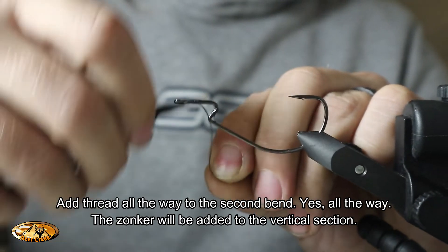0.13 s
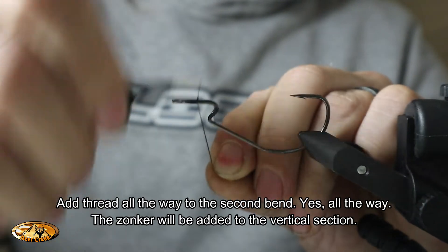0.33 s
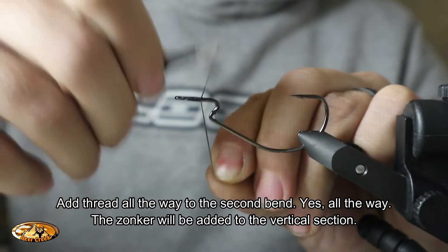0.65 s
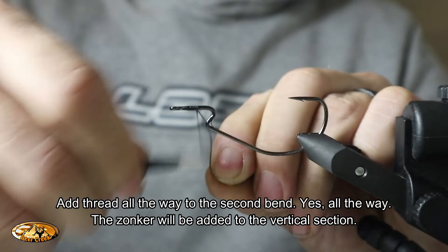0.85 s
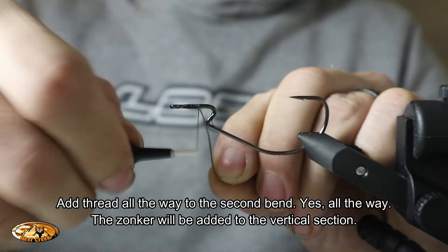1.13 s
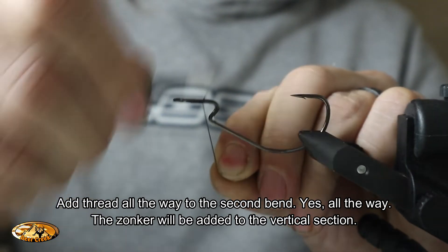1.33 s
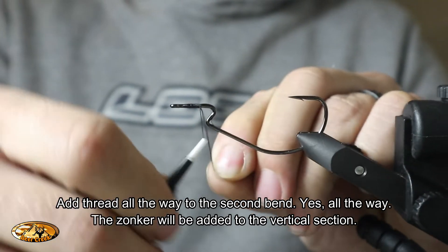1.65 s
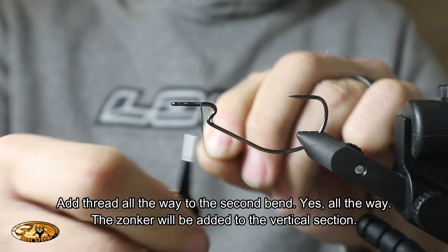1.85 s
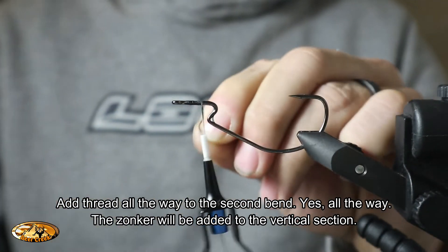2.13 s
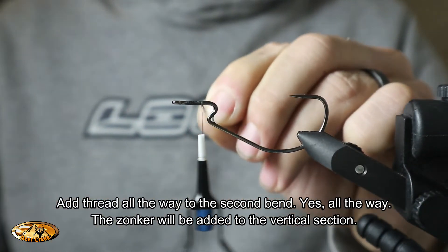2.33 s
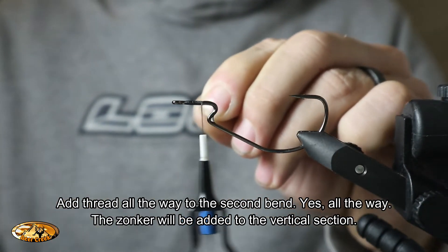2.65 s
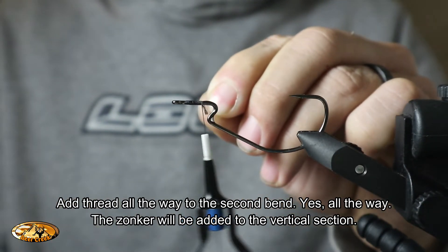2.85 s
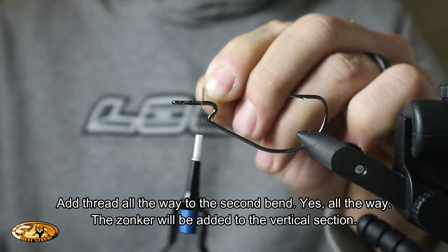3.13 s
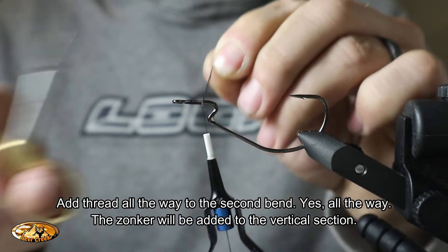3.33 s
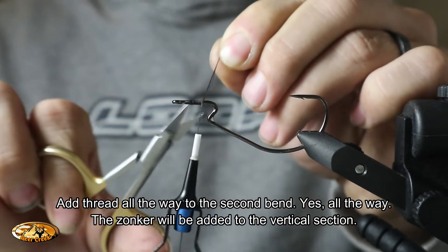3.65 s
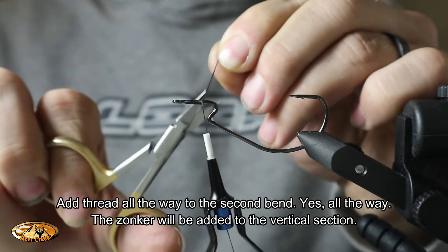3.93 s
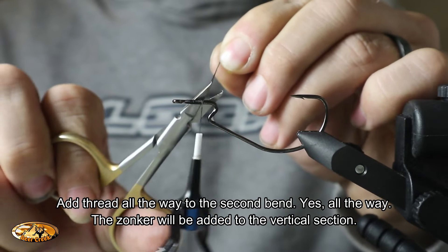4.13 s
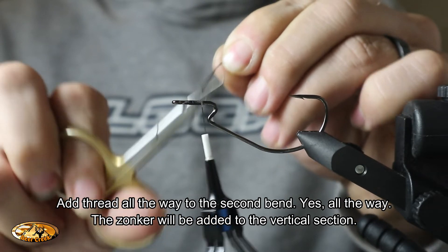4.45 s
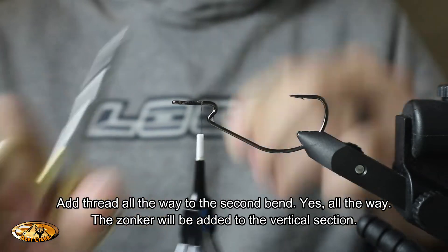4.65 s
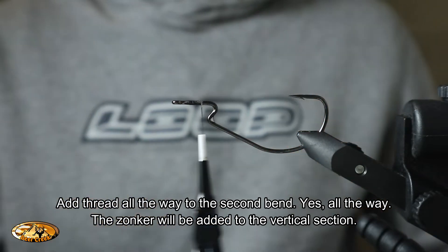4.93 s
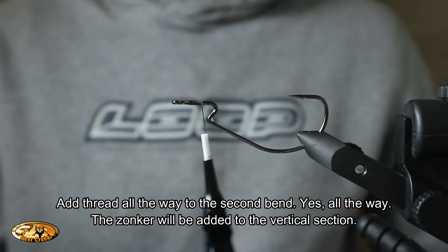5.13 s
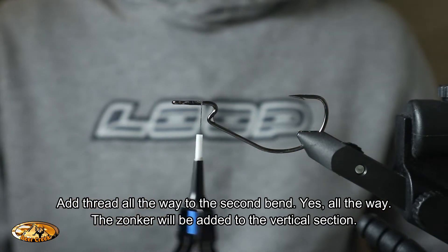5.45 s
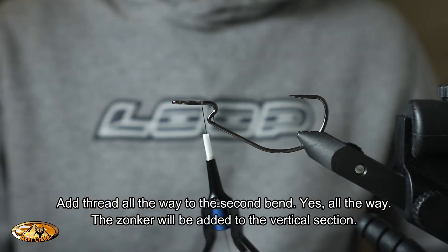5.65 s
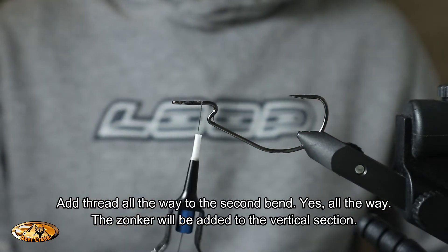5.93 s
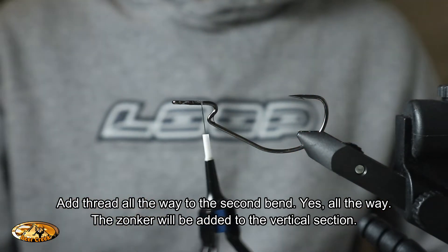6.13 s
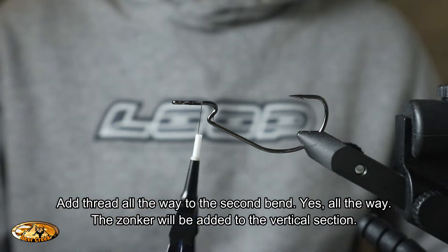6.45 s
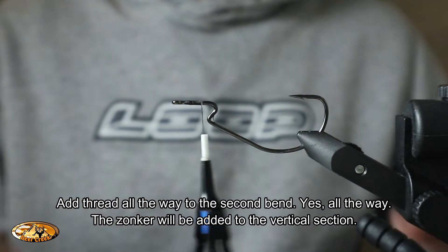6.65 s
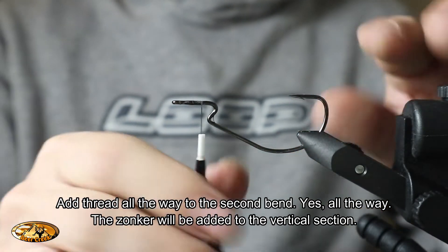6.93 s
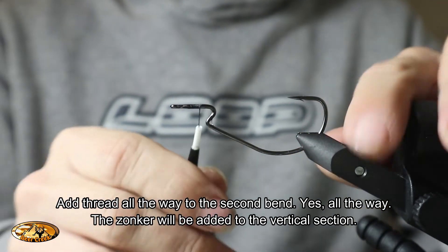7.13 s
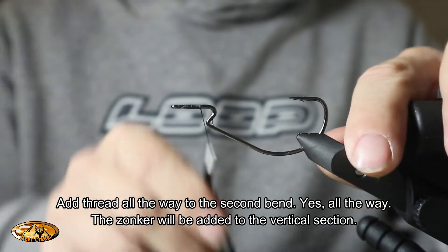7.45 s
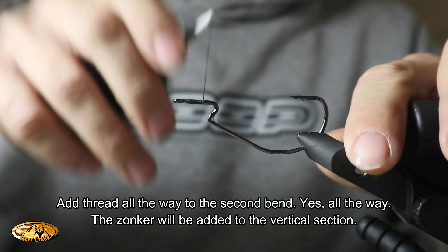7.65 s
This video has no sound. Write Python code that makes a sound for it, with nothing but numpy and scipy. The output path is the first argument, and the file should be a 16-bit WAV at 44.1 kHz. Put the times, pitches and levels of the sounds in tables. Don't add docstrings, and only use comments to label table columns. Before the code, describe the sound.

Faint thread-winding ticks, a bright scissors clatter, a tiny snip, then three loud woody knocks with quick bounces over steady soft hiss.

```python
import sys
import numpy as np
from scipy import signal
from scipy.fft import rfft, irfft, next_fast_len
from scipy.io import wavfile
from scipy.ndimage import uniform_filter1d

SR = 44100
rng = np.random.default_rng(int(sys.argv[2]) if len(sys.argv) > 2 else 0)


def output_pcm(signal):
    pcm = np.clip(np.atleast_2d(signal).T, -1, 1) * 32767
    wavfile.write(sys.argv[1], SR, np.round(pcm).astype(np.int16))


def convert_level_to_amplitude(level_db):
    exponent = np.asarray(level_db, float) / 20
    return 10 ** exponent


N = 343980

# f/Hz, level/dB, t60/s
DESK_MODES = [(208, -0.5, 0.041), (266.5, -6, 0.35), (388, 4.5, 0.042), (492.4, -6, 0.44),
              (580, -2.5, 0.085), (757, -20.5, 0.16), (1010, -30, 0.042), (1000, 3.5, 0.015)]


def rms_one(x):
    return x / np.sqrt(np.mean(x ** 2) + 1e-20)


def at_hz(points, hz):
    table = np.array(points)
    return np.interp(np.log(hz + 1), np.log(table[:, 0]), table[:, 1])


def colour(x, points, even_hz=0):
    size = 2 * next_fast_len(len(x) // 2 + 1)
    spectrum = rfft(x, size)
    gain = convert_level_to_amplitude(at_hz(points, np.fft.rfftfreq(size, 1 / SR)))
    if even_hz:
        own = uniform_filter1d(np.abs(spectrum) ** 2, int(even_hz * size / SR))
        gain *= np.sqrt(np.mean(own) / own)
    cepstrum = irfft(np.log(gain), size)
    cepstrum[1:size // 2] *= 2
    cepstrum[size // 2 + 1:] = 0
    return irfft(spectrum * np.exp(rfft(cepstrum)), size)[:len(x)]


def band(x, low_hz, high_hz, order=2):
    sos = signal.butter(order, [low_hz, min(high_hz, 20000)], "band", fs=SR, output="sos")
    return signal.sosfilt(sos, x + 1e-18)


def drift(rate_hz):
    r = np.exp(-80 * np.pi * rate_hz / SR)
    slow = signal.lfilter([1], [1, -2 * r, r * r], rng.standard_normal(N // 40 + 1002))[1000:]
    return np.interp(np.arange(N) / 40, np.arange(len(slow)), rms_one(slow))


def ring(force, hz, t60):
    r = convert_level_to_amplitude(-60 / (t60 * SR))
    w = 2 * np.pi * hz / SR
    return signal.lfilter([0, np.sin(w)], [1, -2 * r * np.cos(w), r * r], force + 1e-18)


def body(force, modes, damping, spread_db):
    out = 0
    for k, (hz, db, t60) in enumerate(modes):
        push = force * convert_level_to_amplitude(db + spread_db * drift(47.5))
        out = out + (-1) ** k * ring(push, hz, min(t60 * damping, .07))
    return out


def contacts(rows, index, first, cycles=0, axis=3):
    out, t = np.zeros(N + 2000), np.arange(2000) / SR
    chatter = rng.standard_normal((len(rows), 2000))
    for row, noise in zip(rows, chatter):
        contact_ms = max(row[axis], .1)
        burst = np.append(first, noise[1:]) * np.exp(-t * 1000 / contact_ms)
        if cycles:
            burst = ring(burst, row[-1], cycles / row[-1])
        at = round(row[0] * SR)
        out[at:at + 2000] += convert_level_to_amplitude(row[index]) * burst / np.sqrt(np.sum(burst ** 2))
    return out[:N]


def touches(rows, tool_db, broad_db, own_db, cycles, top_hz):
    # f/Hz, level/dB, t60/s
    tool_modes = [(907, -2.5, 0.27), (1067, -25, 0.13), (1950, 5, 0.074), (2400, 7, 0.06), (2480, 4, 0.16),
                  (2600, 0.5, 0.055), (2850, -15, 0.14), (3960, -9, 0.073), (5600, -44, 0.83),
                  (5850, 9, 0.055)]
    force = contacts(rows, index=1, first=0.32)
    tick = convert_level_to_amplitude(tool_db) * body(force, tool_modes, damping=0.22, spread_db=-4.0)
    tick += convert_level_to_amplitude(broad_db) * force
    tick += convert_level_to_amplitude(own_db) * contacts(rows, index=1, first=0.86, cycles=cycles)
    force = contacts(rows, index=2, first=4.9)
    knock = convert_level_to_amplitude(7.0) * body(force, DESK_MODES, damping=0.17, spread_db=1.5)
    knock += convert_level_to_amplitude(25.0) * band(force, 230, 900, order=3)
    return band(tick, 565, top_hz, order=3) + knock


def hiss(spectrum, db):
    return convert_level_to_amplitude(db) * rms_one(colour(rng.standard_normal(N), spectrum))


def room(x, wet_db):
    # f/Hz, level/dB
    echo_colour = [(100, 9), (250, -4.5), (1000, -0.5), (4000, 0.5), (10000, -5.5), (16500, -10),
                   (22000, -54)]
    # f/Hz, t60/s
    decay = [(150, 0.74), (400, 0.25), (1000, 0.19), (2500, 0.18), (6000, 0.16), (12000, 0.14)]
    t = np.arange(SR // 2) / SR
    splits = 90 * 2.0 ** np.arange(0, 7.6, .5)
    tail = 0
    for low, high in zip(splits, splits[1:]):
        fade = convert_level_to_amplitude(-60 * t / at_hz(decay, np.sqrt(low * high)))
        tail = tail + band(rng.standard_normal(len(t)), low, high) * fade
    tail *= np.clip((t - .002) / 0.003, 0, 1)
    tail = colour(tail, echo_colour, even_hz=130.0)
    return signal.fftconvolve(x, convert_level_to_amplitude(wet_db) * tail / np.sqrt(np.sum(tail ** 2)))[:N]


def pushes(rows, rise_db_per_s, rest_db):
    t = np.arange(0, N + 40, 40) / SR
    power = 0
    for row in rows:
        fall_db = np.where(t < row[0], rise_db_per_s * (row[0] - t), 60 * (t - row[0]) / row[-1])
        power = power + convert_level_to_amplitude(2 * (row[1] - fall_db))
    tremor = convert_level_to_amplitude(2 * (rest_db + 4.1 * drift(2.4)))
    return np.sqrt(np.interp(np.arange(N) / SR, t, power) + tremor)


def sway(hz, wander, gain):
    phase = 2 * np.pi * np.cumsum(hz * (1 + wander * drift(13.7))) / SR
    return np.sqrt(2) * np.sin(phase) * gain


def desk_rock():
    # t/s, peak level/dB, f/Hz, t60/s
    shoves = [(0.058, -45, 65.5, 0.94), (0.2, -51.5, 55.8, 0.79), (0.392, -53, 61, 1.9),
              (0.59, -61, 63.5, 2), (0.85, -55, 60.1, 3.9), (1.13, -43, 61.6, 0.21), (1.21, -49, 60, 1.6),
              (1.429, -45.5, 60.9, 0.74), (1.56, -56, 54, .5), (1.65, -52, 56.9, 1.2),
              (2.021, -32, 63.8, 0.098), (2.12, -44, 74.3, 0.48), (2.18, -46, 59.4, 0.37),
              (2.78, -42, 73.2, 0.95), (2.869, -37, 63, 0.55), (3.52, -61, 61.4, 1.15),
              (3.82, -56, 62.5, 1.3), (4.11, -47.5, 58.2, 0.36), (4.432, -30.5, 60.2, 0.55),
              (5.73, -56, 71, 0.25), (6.15, -42, 64.3, 0.15), (6.28, -66, 70.6, 0.17),
              (7.152, -29.5, 58.5, 0.22), (7.429, -52, 60.2, 1.23), (7.69, -42.5, 61.3, 0.98),
              (7.795, -36.5, 60, 0.49)]
    # t/s, peak level/dB, f/Hz, t60/s
    jolts = [
        (5.565, -44, 72.3, 0.38),
        (6.11, -38.5, 63.9, 0.78),
        (6.45, -33, 73.9, 0.48),
        (7.055, -29, 65.4, 0.61),
    ]
    times, pitches = np.array(sorted(shoves + jolts))[:, [0, 2]].T
    hz = np.interp(np.arange(N) / SR, times, pitches)
    gain = pushes(shoves, rise_db_per_s=315, rest_db=-79)
    gain = gain + pushes(jolts, rise_db_per_s=1403, rest_db=-120)
    return sway(hz, wander=0.049, gain=gain)


def desk_flex():
    # t/s, peak level/dB, t60/s
    taps = [(0.05, -51, 0.11), (0.39, -48, 0.11), (0.59, -59, 0.44), (1.13, -46, 0.11), (1.21, -48.5, 0.34),
            (1.43, -53, 0.35), (1.56, -47, 0.079), (1.65, -57.5, 0.71), (1.96, -50.5, 0.83),
            (2.02, -44, 0.15), (2.11, -50, 0.15), (2.91, -31.5, 0.083), (3.01, -44, 0.38), (3.26, -69, 0.7),
            (4.28, -67, 0.23), (4.41, -41, 0.18), (4.72, -69, 0.58), (5.73, -43, 0.082), (5.89, -56, 0.14),
            (6.14, -50, 0.072), (6.58, -41.5, 0.52), (7.21, -46, 0.067), (7.69, -55, 0.39)]
    # t/s, peak level/dB, t60/s
    struck = [
        (2.768, -34.5, 0.18),
        (5.55, -40, 0.27),
        (6.094, -22.5, 0.26),
        (6.266, -28.5, 0.18),
        (6.438, -19, 0.18),
        (7.045, -33, 0.35),
    ]
    gain = pushes(taps, rise_db_per_s=552, rest_db=-69)
    gain = gain + pushes(struck, rise_db_per_s=4004, rest_db=-120)
    return sway(144.6, wander=0.0513, gain=gain)


def bead():
    # t/s, level/dB, f/Hz, t60/s
    note = [
        (3.072, -38, 925, 0.04),
    ]
    s, db, hz, t60 = note[0]
    click = np.zeros(N)
    click[round(s * SR)] = convert_level_to_amplitude(db)
    return ring(click, hz, t60)


def stroke(row, press, index):
    attack_s, release_s, edge_db = 0.03, 0.014, 33
    t = np.arange(N) / SR - row[0]
    edge = np.clip(1 - t / attack_s, 0, None) + np.clip((t - row[1]) / release_s, 0, None)
    pressure_db = press[index] * np.clip(t / row[1], 0, 1)
    return convert_level_to_amplitude(row[index + 2] + pressure_db - np.minimum(edge_db * edge, 200))


def drags():
    # start t/s, length/s, body level/dB, sheen level/dB, rumble level/dB
    strokes = [
        (1.129, 0.23, -46, -45.5, -52.5),
        (2.626, 0.15, -34, -41, -55.5),
        (2.734, 0.227, -65, -76, -32),
        (6.333, 0.087, -51.5, -53, -43.5),
        (7.037, 0.13, -51.5, -60, -49),
    ]
    # body/dB, sheen/dB, rumble/dB
    presses = [
        (-18.5, -35, 3.5),
        (-12.5, -25, 21.5),
        (-14, -23, 1),
        (6, -18, 17.5),
        (-2.5, -6, -2),
    ]
    centres = [2350, 2566, 2570, 1757, 3580]
    widths = [2.5, 0.77, .6, 1.4, .1]
    slips = convert_level_to_amplitude(3.5 * np.minimum(rng.exponential(1, N), 4))
    slips = slips * rng.choice([-1, 1], N) * (rng.random(N) < 6000 / SR)
    broad = rms_one(band(slips, 780, 3800, order=3))
    desk = rms_one(body(slips[::-1], DESK_MODES, damping=0.3, spread_db=2.0))
    sheen = rms_one(band(slips, 5730, 9850, order=4))
    out = 0
    for row, press, hz, wide in zip(strokes, presses, centres, widths):
        rub = wide * broad + rms_one(ring(slips, hz, 16.0 / hz))
        out = out + rub * stroke(row, press, index=0)
        out = out + sheen * stroke(row, press, index=1) + desk * stroke(row, press, index=2)
    return convert_level_to_amplitude(-8.5) * out


def steel_edges():
    # t/s, level/dB, contact/ms
    meets = [
        (0.366, -61, 1.17),
        (1.118, -64.5, 2.56),
        (1.147, -48, 4),
        (1.157, -35, 3.3),
        (1.194, -47, 1.8),
        (2.842, -33.5, 8),
        (2.931, -40, 3.4),
        (7.641, -58, 1.31),
    ]
    # t/s, level/dB, contact/ms
    cuts = [
        (4.7, -45, 2.5),
        (4.3685, -39.5, 2),
        (4.3805, -37.5, 1.2),
        (4.371, -41, 12),
    ]
    rub = band(contacts(meets, index=1, first=1.4, axis=2), 5500, 10000, order=2)
    cut = contacts(cuts, index=1, first=1.4, axis=2)
    cut = convert_level_to_amplitude(-6.0) * band(cut, 4600, 15000) + convert_level_to_amplitude(-7) * ring(cut, 9800, 0.0016)
    return convert_level_to_amplitude(11.5) * (rub + cut)


def handling():
    # t/s, tick peak level/dB,
    # knock level/dB, contact/ms, tick f/Hz
    small_touches = [(0.271, -40.5, -50.5, 3, 1370), (0.366, -34.5, -51, 1.8, 2450),
                     (0.377, -46, -53.5, 1.4, 2500), (1.241, -34, -54, 2.8, 2010), (0.496, -53, -62, 1.7, 1950),
                     (0.534, -48, -52, 0.51, 1230), (0.786, -41.5, -56, 1.4, 2400), (0.905, -48, -51, 4, 1216),
                     (1.118, -34.5, -47.5, 2.5, 2400), (1.157, -39, -68, 2.4, 2290), (1.162, -38, -69, 5.1, 2850),
                     (1.165, -30, -69, 6.5, 3600), (1.183, -43, -67, 4, 2150), (1.194, -45, -53, 3, 2260),
                     (1.203, -38, -51, 4, 2800), (1.221, -41, -48, 5.1, 2250), (1.408, -35.5, -44, 1.2, 2500),
                     (1.509, -34.5, -60, 1.5, 2300), (1.5165, -33.5, -53, 4, 1250), (1.532, -39, -48, 1.9, 2300),
                     (3.989, -44.5, -61, 3.2, 2320), (4.333, -48, -71, 4, 2500), (4.3675, -43.5, -70, 2.9, 2380),
             (4.378, -40.5, -74, 2.9, 2006), (5.542, -32, -41, 2.4, 2250), (5.549, -33, -41, 4.8, 3350),
             (5.63, -47, -66, 5.5, 3000), (5.711, -41, -46, 2.5, 1300), (7.626, -59, -63, 1.4, 2400),
             (7.641, -38.5, -67, 1.4, 2530), (7.712, -45, -69, 3.9, 2400), (7.746, -50, -73, 2.5, 2463)]
    ticks = touches(small_touches, tool_db=-51, broad_db=17.5, own_db=15, cycles=10.0, top_hz=3860)
    return band(ticks, 40, 4630)


def scissors_clatter():
    # t/s, tick peak level/dB, knock level/dB, contact/ms, tick f/Hz
    hits = [(2.651, -33, -55, 3.7, 2150), (2.7605, -50, -27, 3, 870), (2.8015, -25, -33, 3, 2540),
            (2.806, -28, -46, 2.6, 927), (2.8395, -15.5, -41, 5, 2550), (2.8435, -16, -36, 2.2, 2470),
            (2.8476, -13.5, -23, 2.5, 2480), (2.856, -22, -33, 1.05, 2370), (2.859, -22.5, -32, 3.2, 3950),
            (2.849, -22, -28.5, 5.5, 4240), (2.868, -23, -54, 2.6, 2600), (2.879, -38, -49, 3.3, 2450),
            (2.9065, -21.5, -52, 5, 2500), (2.911, -33, -35, 7.6, 4160), (2.927, -18.5, -29, 5, 920),
            (2.930, -38, -54, 2.7, 4160), (2.939, -21.5, -59, 5.4, 1000), (2.963, -27, -48, 3.2, 1020),
            (2.970, -26.5, -46, 1.34, 2550), (2.974, -22.5, -31.5, 7.3, 1250), (2.982, -28, -41, 2.1, 2400),
            (2.989, -28, -48, 3, 3570), (2.992, -30, -42, 1.8, 2500), (2.997, -29.5, -45, 3, 3600),
            (2.811, -25, -40, 5.1, 2500), (3.006, -35, -60, 10, 3630)]
    ticks = touches(hits, tool_db=-17.5, broad_db=13.0, own_db=13.5, cycles=26.0, top_hz=4700)
    return band(ticks, 40, 4900, order=4)


def cracks():
    # t/s, crack level/dB, thud level/dB
    blows = [
        (6.0884, -28, 9.5),
        (6.0900, -30, 6),
        (6.2586, -55, 4),
        (6.2868, -50, -5),
        (6.4315, -23, 1),
        (6.4328, -24, 5),
        (6.4382, -28, 5),
    ]
    s, crack_db, thud_db = np.transpose(blows)
    clicks = np.zeros((2, N))
    clicks[:, np.round(s * SR).astype(int)] = convert_level_to_amplitude(np.array([crack_db, thud_db]))
    return band(clicks[0], 7000, 14000) - band(clicks[1], 248, 1090)


def drops():
    # t/s, peak level/dB, contact/ms
    falls = [
        [(6.0884, -8, 0.7), (6.0897, -6.5, 1.7), (6.0930, -7.5, 3.3), (6.0975, -7.5, 11)],
        [(6.2585, -11, 7.6), (6.2660, -10.5, 2.1)],
        [(6.4315, -1, 0.93), (6.4325, 0.5, 1), (6.4333, -2.5, 0.45), (6.4380, -11.5, 0.61), (6.4420, -21, 7.3)],
    ]
    # f/Hz, level/dB per Hz
    colours = [
        [(110, -40), (200, -6.5), (400, -5), (1000, -9), (1800, -22), (2900, -12.5), (4200, -24.5),
         (5900, -28.5), (10000, -34), (16000, -49)],
        [(130, -38), (210, -6), (300, -2), (600, -0.5), (1000, -6.5), (1700, -18.5), (2700, -12.5),
         (4300, -28.5), (8000, -48.5), (14000, -66)],
        [(110, -28), (200, -5.5), (350, 1), (620, -3.5), (1200, -5.5), (1900, -11.5), (3300, -13.5),
         (5000, -27), (8800, -32.5), (16000, -56)],
    ]
    # f/Hz, level/dB, t60/s
    own_rings = [
        [(1122, -60, 0.026), (2718, -41, 0.012), (3544, -36, 0.0221), (5860, -27.5, .022)],
        [(1250, -50, 0.028), (2720, -43, .018), (3460, -38, 0.022), (1930, -37, 0.017)],
        [(1370, -44, 0.017), (2600, -47, .015), (3430, -38, 0.01), (5210, -23, 0.014)],
    ]
    # f/Hz, level/dB, t60/s
    panels = [(283.8, -54, 0.14), (459, -50, 0.14), (622, -49, 0.097), (717, -43.5, 0.04)]
    # t/s, tick peak level/dB, knock level/dB, contact/ms, tick f/Hz
    rebound = [
        (6.4378, -24, -55, 1.2, 3174),
        (6.4384, -14.5, -42, 0.77, 5000),
    ]
    out = 0
    for rows, points, rings in zip(falls, colours, own_rings):
        force = contacts(rows, index=1, first=-3.5, axis=2)
        struck = force + convert_level_to_amplitude(-26.5) * body(force, DESK_MODES, damping=0.11, spread_db=6.0)
        blow = convert_level_to_amplitude(26.0) * colour(struck, points, even_hz=118.0)
        out = out + blow
        for hz, db, t60 in rings + panels:
            out = out + convert_level_to_amplitude(db) * ring(blow, hz, t60)
    return out + touches(rebound, tool_db=-32, broad_db=-1.0, own_db=9.5, cycles=11.0, top_hz=5700)


def scene():
    # f/Hz, level/dB per Hz
    hiss_mid = [(15, -56), (25, -5), (59, -7.5), (117, -4), (145, -14), (170, -9.5), (229, -10),
                (451, -12.5), (754, -15.5), (818, -16.5), (2110, -18.5), (11600, -41), (16000, -68)]
    # f/Hz, level/dB per Hz
    hiss_side = [(15, -34), (25, -28), (145, -7), (285, -3), (335, -4), (416, -4), (575, -4.5), (840, -6.5),
                 (2910, -12), (11000, -30.5), (16000, -49)]
    # f/Hz, side minus mid level/dB
    width = [(60, -25), (110, -30), (200, -19), (380, -21), (700, -15), (1290, -12), (2380, -8.5),
             (4400, 0.5), (8120, 5), (15000, 10)]
    near = handling() + drops() + drags() + bead() + steel_edges() + cracks()
    clatter = scissors_clatter()
    far = near + convert_level_to_amplitude(-4.5) * clatter
    near = near + clatter
    low = desk_rock() + desk_flex()
    mid = near + room(far, wet_db=-9.5) + low + hiss(hiss_mid, -54.5)
    across = np.imag(signal.hilbert(near))
    side = colour(near - 0.21 * across + room(far, wet_db=-11.0), width)
    side += convert_level_to_amplitude(-73.0) * low + hiss(hiss_side, -51.5)
    return np.array([mid + side, mid - side])


def band_limit(x):
    return signal.sosfilt(signal.butter(12, 16400, fs=SR, output="sos"), x)


def record(dry):
    low_pass = signal.cheby2(10, 50, 16300, fs=SR, output="sos")
    mix = signal.sosfilt(low_pass, np.clip(dry, -1, 1))
    return band_limit(mix)


dry = scene()
out = record(dry)
output_pcm(out)
```